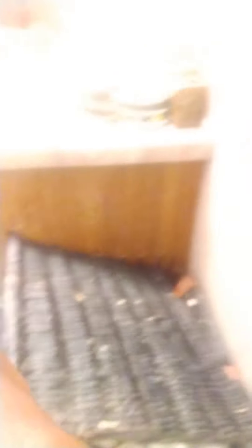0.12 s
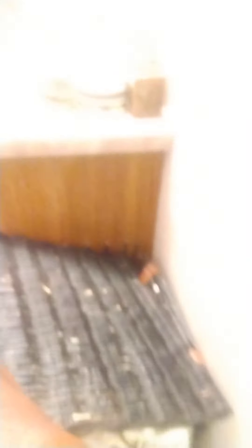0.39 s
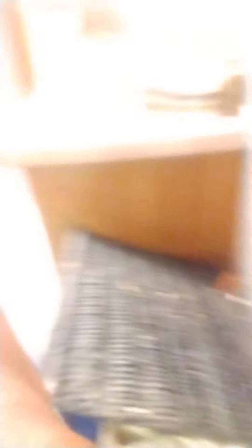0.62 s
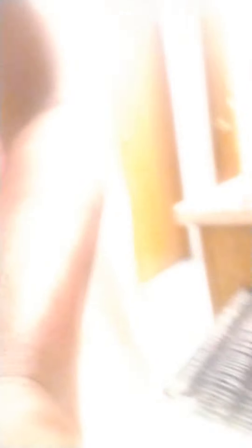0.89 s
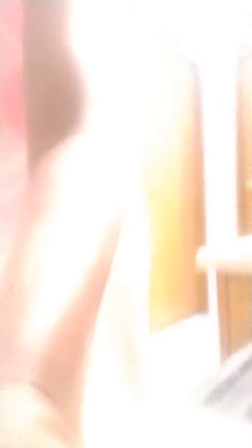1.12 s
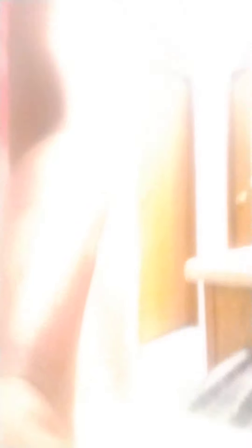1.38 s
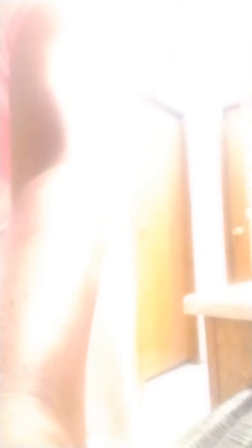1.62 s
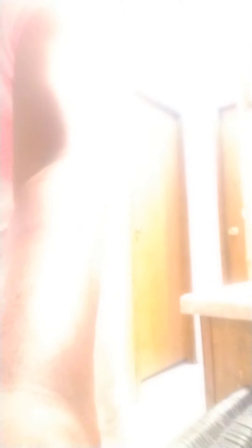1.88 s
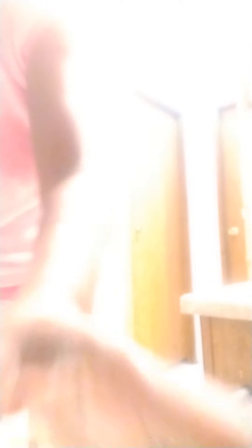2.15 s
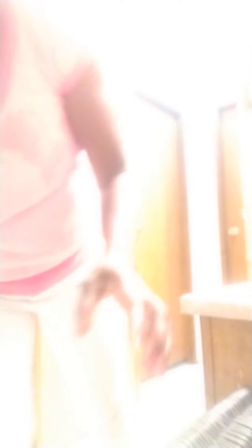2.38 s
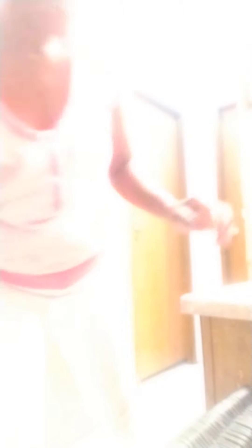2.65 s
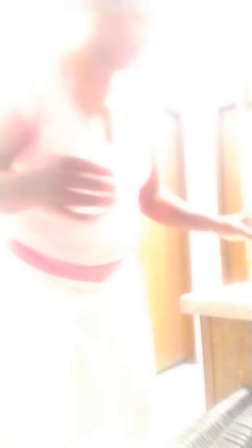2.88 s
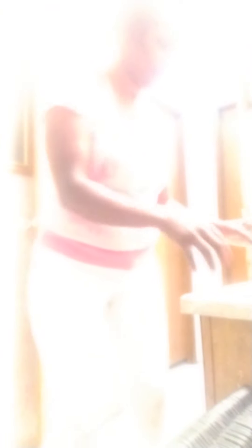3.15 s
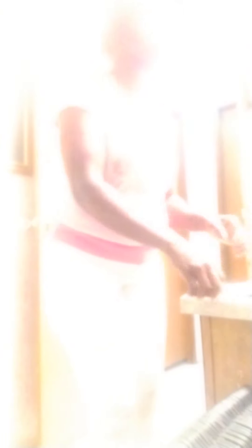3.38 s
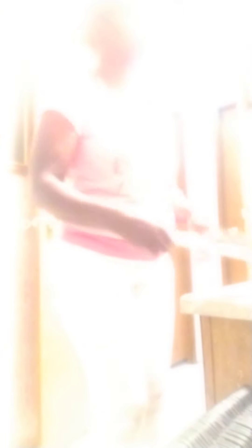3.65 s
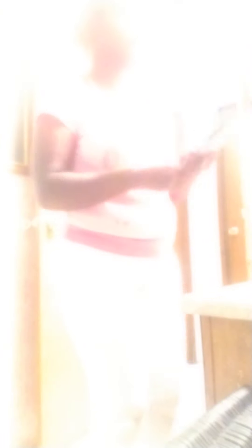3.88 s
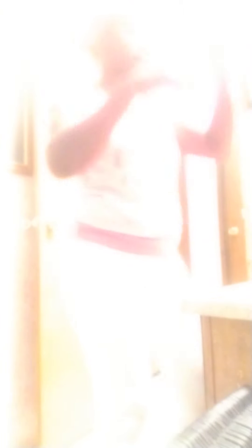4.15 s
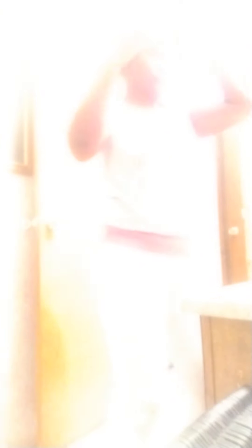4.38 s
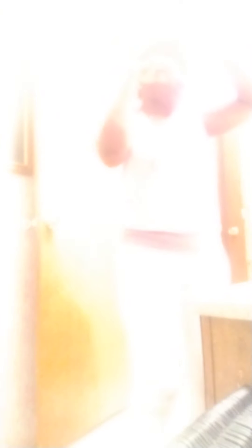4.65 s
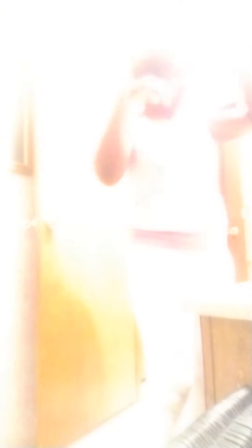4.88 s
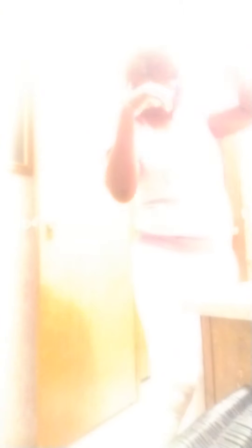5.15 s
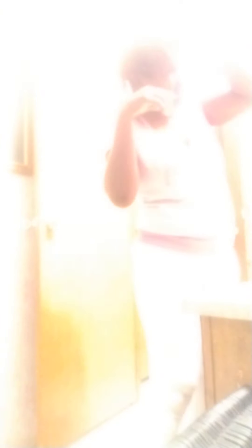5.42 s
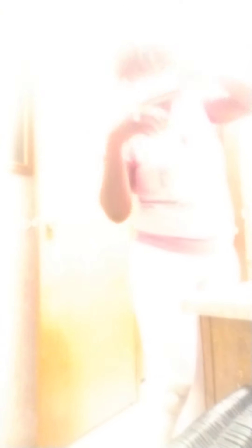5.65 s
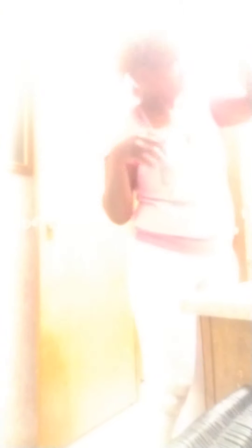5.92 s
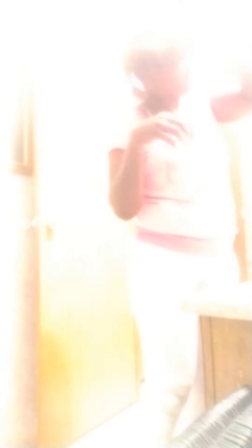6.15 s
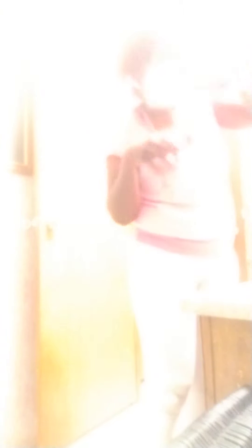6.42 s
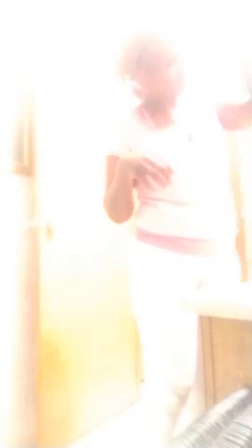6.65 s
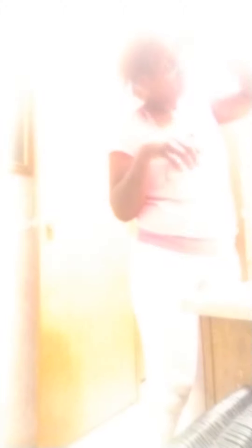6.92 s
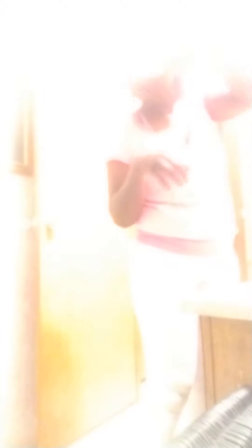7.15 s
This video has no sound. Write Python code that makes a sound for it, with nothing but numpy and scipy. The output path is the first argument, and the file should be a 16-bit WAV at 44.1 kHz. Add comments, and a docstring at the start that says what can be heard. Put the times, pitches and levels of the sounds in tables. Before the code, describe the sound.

A phone knocks and jolts hard onto a hollow bathroom fitting, slides into place, then small things tap on the counter amid soft cloth rustles.

```python
"""A hollow bathroom fitting rings dully as a phone propped on it knocks, jolts and slides into place;
each knock is a sum of decaying modes, and each slide is noise shaped by the same resonances.
Later, small things are moved and tapped on the counter, felt through the fitting, and cloth rustles:
taps excite the modes, hard edges give short noise cracks, friction gives swelling coloured noise.
A quiet room lies beneath, made of coloured noise and wavering hum lines; a thin hiss comes and goes."""
import sys
import numpy as np
from scipy import signal
from scipy.fft import rfft, irfft, next_fast_len
from scipy.io import wavfile
from scipy.ndimage import uniform_filter1d

SR = 44100
rng = np.random.default_rng(int(sys.argv[2]) if len(sys.argv) > 2 else 0)


def transcribe(u):
    """Save the signal u as a 16-bit wav file named by the first command-line argument.

    u: samples, shape (n,) or (channels, n), limited to [-1, 1]; the rate is SR.
    q: integer samples, one column per channel.
    """
    v = np.clip(np.atleast_2d(u).T, -1, 1)
    q = np.round(v * 32767).astype(np.int16)
    wavfile.write(sys.argv[1], SR, q)


def invert_db(x):
    """Field ratio 10**(x/20) for x, a level in decibels (scalar or array-like)."""
    u = np.asarray(x, float) / 20
    return 10 ** u


N = 321489
TIME = np.arange(N) / SR
FADE_DB = 20  # rise and fall times of a swell span this much

# Likeness of the left and right sound fields: frequency_hz, likeness (0 to 1)
LIKENESS = [(60, 0.4), (300, 1), (640, 0.37), (1300, 0), (16000, 0)]
# Spectrum of the still air and microphone hiss: frequency_hz, relative_density_db (per Hz)
ROOM_COLOUR = [(20, -47.5), (40, -22), (70, -12), (110, -9), (176, -10.5), (230, -11.5), (330, -13.5),
               (419, -33), (775, -24.5), (1300, -26.5), (1890, -30), (2240, -27), (3310, -35.5),
               (8000, -41), (11000, -41), (15800, -42.5)]
# Appliance hum lines: frequency_hz, level_db (rms, before lift and wavering), waver_db (signed)
HUM_LINES = [(56.8, -69, 0.15), (108.3, -74, 2.5), (178, -72.5, 1.5), (225, -79, 1), (2206, -92, 4.5),
             (2270, -90.5, -1.5)]
# The fitting passes on more hum than the hand did: time_s, lift_db
HUM_LIFT = [(0, -0.5), (1.2, 1), (1.4, 1.5), (7.29, 0)]
# Modes of the hollow fitting: frequency_hz, relative_level_db, t60_s (before contact changes it)
FITTING_MODES = [(105, -5, 0.09), (179.8, 1, 0.092), (255, -4.5, 0.16), (315, 0, 0.14), (377, -3, 0.2),
                 (456.4, -4.5, 0.14), (564.5, -7, 0.077), (648, -7, 0.13), (764, -14, 0.24),
                 (875, -13, 0.32), (956, -9, 0.11), (1038, -20, 0.093), (1113, -26.5, 0.38),
                 (1328, -19, 0.151), (1636, -16, 0.033), (1880, -22, 0.13), (2012, -21, 0.047),
                 (2380, -19, 0.0592), (2800, -29.5, 0.0735)]
# Humming of the fitting at rest, faint while the phone is still in the hand:
# time_s, low_modes_db, upper_modes_db
REST_LEVELS = [(0, -74, -79), (.5, -77, -92), (1.02, -71, -99), (1.45, -61, -76), (2.0, -62, -81),
               (2.8, -64, -94), (3.3, -60.5, -76), (4.5, -62.5, -80), (5.3, -61, -69), (6.0, -63.5, -75.5),
               (6.35, -60, -74.5), (6.75, -65, -81), (7.29, -57.5, -74.5)]
# Slides and shoves along the fitting: peak_s, rise_s, fall_s, low_modes_db, upper_modes_db
SHOVES = [(1.13, 0.033, 0.26, -48.5, -58.5), (1.205, 0.036, 0.1, -52, -55.5),
          (1.304, 0.036, 0.1, -45, -48.5), (1.37, 0.031, 0.12, -48.5, -60.5),
          (1.52, 0.041, 0.27, -51.5, -60), (1.6, 0.17, 0.13, -50.5, -54), (1.81, 0.047, 0.12, -51.5, -72),
          (1.869, .08, 0.1, -62.5, -70), (2.95, .06, 0.24, -74, -74), (3.525, 0.097, .22, -47.5, -59),
          (3.62, 0.053, 0.027, -70, -66), (4.27, .1, 0.11, -64.5, -66.5), (4.46, 0.027, 0.1, -52, -69.5),
          (4.67, 0.06, .3, -62, -61.5), (4.79, 0.14, 0.26, -47, -52.5), (4.87, 0.26, 0.092, -51, -61),
          (5.03, .04, .2, -78, -63.5), (5.466, 0.055, 0.08, -58.5, -60), (5.68, 0.57, 0.059, -61.5, -67),
          (6.245, 0.064, .3, -63, -68.5), (6.475, 0.054, 0.074, -56, -66.5), (6.98, 0.013, .15, -58, -68),
          (7.17, 0.41, 0.22, -65.5, -67.5)]
# Blows on the phone's case: start_s, level_db (nearer port), left_minus_right_db, swing_hz,
# cycles (decay scale), first_swing (-1 in, 1 out)
JOLTS = [(1.2876, -1, -17, 350, 1.25, -1), (1.2964, -10, -16, 650, 1.1, 1), (1.0846, -20, -8, 750, 1.2, 1)]
# Hard edges clicking: start_s, level_db (6 dB above onset rms), left_minus_right_db, centre_hz,
# decay_ms (to 1/e)
TICKS = [(1.085, -30, 12.5, 4080, 0.33), (1.204, -55, 27, 9100, 5.7), (1.288, -21.5, -13.5, 6200, 1.1),
         (1.2885, -19, -24, 1052, 2.4), (1.2899, -31.5, -15, 5540, 1.5), (1.2975, -20.5, 8.5, 8500, 0.72),
         (1.5212, -55, 20.5, 9600, 3.6), (1.716, -42.5, -11, 2460, 0.49), (1.7709, -57, -5, 6200, 3),
         (1.494, -56, 2, 1290, 1.7), (1.624, -44, -2, 1900, 2.2), (1.8786, -56, -8, 3160, 1.2),
         (2.9637, -62.5, 14, 10740, 21), (2.964, -64, 7, 5770, 73), (3.509, -49, 9, 2200, 3),
         (3.94, -67, 14.5, 11500, 28), (4.2248, -56, 9, 3600, 4.5), (4.263, -61, 8, 1970, 3.5),
         (4.5441, -55.5, 11.5, 11400, 30), (4.653, -46, 7.5, 4900, 24), (4.7256, -42, 12, 8600, 3),
         (4.8464, -48, 11, 8060, 3.3), (4.8594, -46, 13, 13000, 3), (4.9316, -51, 14, 10000, 2.2),
         (4.995, -56, 7, 1200, 2.2), (5.026, -51, 11, 3800, 1.4), (5.2794, -52.5, 9, 11400, 9),
         (5.447, -56, 6, 3180, 30), (6.238, -59, 7, 3150, 15), (6.4073, -59, 8.5, 11200, 2.7),
         (6.4657, -60, 12, 10200, 4.3), (6.977, -45.5, 12, 9200, 4)]
# Phone knocking on the fitting: start_s, peak_db (before high-pass), left_minus_right_db,
# favoured_mode_hz, brightness_db (per octave), ring_factor (on t60)
KNOCKS = [(1.0852, -24, 13.5, 306, 0.5, 0.37), (1.0937, -21.5, 10, 513, -1, 0.75),
          (1.096, -32.5, 1, 875, -4, 0.2), (1.122, -31, 12, 377, 0, 0.61),
          (1.125, -37, 6.5, 1328, -19, 1.5), (1.201, -37.5, 13, 105, -9, 0.59),
          (1.288, -12.5, -14.5, 174, -4, 0.18), (1.289, -17, 7, 315, -8, 0.7),
          (1.298, -32.5, 6, 1880, -2.5, 1.6), (1.2995, -25, 12, 340, 0.5, 0.75),
          (1.335, -32, 9, 315, -5, .48), (1.352, -38.5, 15, 875, -12, 0.73),
          (1.494, -31.5, 8, 338, -3.5, 0.48), (1.525, -38, 13, 255, 3, 0.29),
          (1.556, -35, 8, 354, -1.5, 0.51), (1.623, -25.5, 0, 238, -11, 0.29),
          (1.625, -32, 11.5, 990, -4, 0.67), (1.633, -31, 10, 431, -11, 0.3),
          (1.653, -32, 2, 435, -1, 0.43), (1.704, -44, 13, 269, -6, 0.36),
          (1.716, -39.5, -0.5, 105, 0, 0.18), (1.79, -34.5, 12, 315, -5, 0.23),
          (1.838, -38, 7.5, 262, -3.5, 0.48), (1.858, -37.5, 6, 379, -7, 0.66),
          (4.4548, -34.5, 9, 375, -21, 0.45)]
# Things tapped on the counter, felt through the fitting: start_s, peak_db (before high-pass),
# brightness_db (per octave), ring_factor (on t60)
TAPS = [(2.944, -58, -12, 0.54), (3.012, -47, -8, 0.55), (3.237, -49.5, -10.5, 0.95),
        (3.316, -51.5, -15, 2), (3.457, -48.5, -12, 2.5), (3.507, -34, -3.5, 0.72),
        (3.538, -37.5, -4, 0.78), (4.687, -44.5, -1.5, .84), (4.726, -36.5, -4, 1.1),
        (4.768, -40, -2, 0.71), (4.787, -37, 1, 0.45), (4.844, -29.5, 1, 0.92), (4.881, -40, -2, 1.1),
        (4.997, -45, 5.5, 0.21), (5.026, -46, 7, 0.34), (5.27, -47.5, -7, 1.1), (6.9744, -41, 3, 1.1)]
# Friction spectra, dull share, bright core and airy share: frequency_hz, relative_density_db (per Hz)
DULL_COLOUR = [(2000, -12), (2700, -3), (3200, -2.5), (4500, -6), (5800, -6), (7000, -21.5)]
BRIGHT_COLOUR = [(4500, -36.5), (5800, -10), (7300, -7.5), (9000, -7), (10000, -4.5), (11300, -3.5),
                 (12000, -9), (13000, -36.5)]
AIRY_COLOUR = [(11000, -37), (12200, -1), (14000, -4.5), (15800, -12)]
# Swishes of cloth and skin: peak_s, rise_s, fall_s, level_db (bright core), dull_share_db (relative)
SWISHES = [(1.09, 0.011, 0.036, -70, 9), (1.3, 0.011, 0.079, -68, 6.5), (1.15, .1, 0.35, -80, 3),
           (1.4, .3, 1.6, -80, 4), (1.77, 0.056, 0.49, -75, -6), (1.86, 0.12, 0.058, -76.5, -1),
           (2.97, 0.024, .12, -69, -5), (3.02, .06, 0.093, -72, -9.5), (3.17, 0.089, 1.1, -69, -11),
           (3.28, 0.17, 0.22, -75, 7), (3.42, 0.85, 0.32, -65, -5.5), (3.525, 0.13, 0.16, -59, -2),
           (3.6, .1, 0.055, -74, -1), (3.78, 0.28, 0.44, -76.5, 3.5), (3.95, 0.044, 0.49, -73.5, -2),
           (4.22, 0.48, 0.17, -77, -1), (4.4, 1.1, 1.5, -79.5, 1.5), (4.555, 0.027, .15, -75.5, -7),
           (4.62, .06, 0.08, -68, -13), (4.664, 0.022, 0.085, -44.5, -8.5), (4.78, 0.19, .3, -62.5, -1.5),
           (4.86, 0.24, 0.086, -62.5, -2), (4.93, .08, 0.93, -72.5, 1), (5.29, 0.031, 0.064, -68.5, 1),
           (5.36, 0.14, 0.45, -73, -5), (5.465, 0.068, 0.15, -63.5, -3.5), (5.6, 0.32, 0.58, -69.5, -3.5),
           (5.8, .2, 0.29, -70.5, -4.5), (6.12, 0.095, 0.39, -73, -9), (6.25, 0.12, 0.2, -64, -8.5),
           (6.47, 0.15, 0.14, -74, -3.5), (6.57, .1, 0.32, -78, -7.5), (6.8, 2.6, 1.2, -85, -1),
           (6.985, 0.026, 0.11, -66.5, -4), (7.15, .3, 0.82, -71.5, -7.5)]
# Case scraping close to the left port: start_s, length_s, end_level_db (bright core),
# swell_db (end minus start), dull_share_db (relative)
SCRAPES = [(1.198, 0.076, -76, -5, -4.5), (1.52, 0.13, -59, 4, -10), (1.708, 0.037, -73.5, 1, -7.5)]
# Modes of a small glazed piece: frequency_hz, initial_level_db (rms), t60_s
CLINK_MODES = [(2853, -68, .15), (3005, -54, .14), (3130, -60, .12), (3176, -52, .22), (3332, -64, .12),
               (3914, -62, .14), (4790, -70, .14)]
# Spectrum of the thin hiss: frequency_hz, relative_density_db (per Hz)
THIN_HISS_COLOUR = [(9000, -30), (9700, -1.5), (11400, 0.5), (12000, -29)]
# Span of the thin hiss: start_s, end_s
THIN_HISS_SPAN = (1.7, 3.05)


def curve(rows):
    """Linear interpolation: the columns of a time table, one value per sample."""
    s, *columns = np.transpose(rows)
    return [np.interp(TIME, s, c) for c in columns]


def over_hz(rows, hz):
    """Logarithmic frequency axis: a spectrum table read at the given frequencies."""
    f, v = np.transpose(rows)
    return np.interp(np.log(hz + 1), np.log(f), v)


def sides(pan_db):
    """Interaural level difference: left and right gains, half the difference each way."""
    return invert_db(np.array([pan_db, -pan_db]) / 2)


def unit(x):
    """Normalisation to an rms of 1."""
    return x / np.sqrt(np.mean(x ** 2))


def walk(rate):
    """Low-passed random steps: a smooth wander of rms 1, with rate steps a second."""
    k = int(SR / rate)
    steps = np.repeat(rng.standard_normal(N // k + 1), k)
    return unit(uniform_filter1d(uniform_filter1d(steps, k), k)[:N])


def pair(gain_of_hz):
    """Partial coherence: coloured stereo noise, most alike near 300 Hz and unrelated in the treble."""
    size = next_fast_len(N)
    hz = np.arange(size // 2 + 1) * SR / size
    like = np.clip(over_hz(LIKENESS, hz), 0, 1)
    mid, side = rfft(rng.standard_normal((2, size))) * gain_of_hz(hz)
    mid = mid * np.sqrt(1 + like)
    side = side * np.sqrt(1 - like)
    return unit(irfft([mid + side, mid - side], size)[:, :N])


def add(out, s, sound):
    """Superposition: mixes a short sound in at time s."""
    i = int(s * SR)
    out[:, i:i + sound.shape[1]] += sound[:, :N - i]


def swell(s, rise_s, fall_s):
    """Exponential growth and decay: gain climbs to 1 at time s and falls, both evenly in dB."""
    coarse = TIME[::16]  # every 16th sample is fine enough
    distance = np.maximum((s - coarse) / rise_s, (coarse - s) / fall_s)
    return np.repeat(invert_db(-FADE_DB * distance), 16)[:N]


def blend(gains):
    """Incoherent summation: unrelated noises add in power."""
    return np.sqrt(sum(g ** 2 for g in gains))


def room():
    """Stationary background: coloured noise plus sinusoids whose level and phase wander."""
    air = invert_db(-68.5) * pair(lambda hz: invert_db(over_hz(ROOM_COLOUR, hz)))
    hum = 0
    for hz, db, waver_db in HUM_LINES:
        level = np.sqrt(2) * invert_db(db + waver_db * walk(8.7))
        phase = 0.42 * waver_db * walk(33)  # radians
        hum = hum + level * np.sin(2 * np.pi * hz * TIME + phase)
    return (air + hum * invert_db(curve(HUM_LIFT)[0])) * sides(1.2)[:, None]


def slide():
    """Frictional excitation: rubbing noise feeds resonances damped by contact; low and upper rise apart."""
    shapes = [swell(s, rise, fall) for s, rise, fall, *_ in SHOVES]
    gains = []
    for rest_db, shove_db in zip(curve(REST_LEVELS), np.transpose(SHOVES)[3:]):
        gains.append(blend([invert_db(rest_db)] + [invert_db(db) * g for db, g in zip(shove_db, shapes)]))
    low_gain, upper_gain = gains

    def modes(group, bright_db, damping):
        """Resonance curve: powers of the modes add, each the wider the greater its damping."""
        def gain(hz):
            power = 0
            for f, db, t60 in group:
                level = invert_db(db + bright_db * np.log2(f / 300))
                power = power + level ** 2 / (1 + ((hz - f) * t60 / damping) ** 2) ** 2
            return np.sqrt(power)
        return gain

    low = pair(modes(FITTING_MODES[2:10], bright_db=0.5, damping=8.6))
    upper = pair(modes(FITTING_MODES[9:], bright_db=0.0, damping=18.3))
    low = low * low_gain * invert_db(1.5 * walk(25))
    upper = upper * upper_gain * invert_db(2.04 * walk(40))
    return (low + upper) * sides(2)[:, None]


def jolts():
    """Impulsive pressure: a blow throws the nearer port in pointed swings that die within two cycles."""
    out, t = np.zeros((2, N)), np.arange(int(SR / 20)) / SR
    for s, db, pan_db, hz, cycles, way in JOLTS:
        swing = way * np.sin(2 * np.pi * hz * t)
        pointed = .25 * swing + .75 * swing ** 7
        pulse = pointed * np.exp(-(t * hz / cycles) ** 4)
        far_cut = invert_db(np.minimum([pan_db, -pan_db], 0))[:, None]  # only the farther port is weakened
        add(out, s, invert_db(db) * far_cut * pulse)
    # the port's vent lets slow pressure out
    return signal.sosfilt(signal.butter(1, 60, "high", fs=SR, output="sos"), out)


def ticks():
    """Broadband transients: noise cracks around a centre pitch, with a faint tail from the near walls."""
    out, t = np.zeros((2, N)), np.arange(4096) / SR
    hz = np.arange(2049) * SR / 4096
    noises = rng.standard_normal((len(TICKS), 2, 4096))
    for (s, db, pan_db, centre_hz, ms), noise in zip(TICKS, noises):
        octaves = np.log2((hz + 1) / centre_hz)
        slope_db = np.where(octaves > 0, -13., 8.) * (0.66 + ms / 8)  # longer scuffs are narrower in pitch
        colour = invert_db(slope_db * octaves)
        shape = np.exp(-t * 1000 / ms) + invert_db(-38) * np.exp(-t / 0.004)
        sound = irfft(rfft(noise) * colour) * shape
        onset_rms = np.sqrt(np.mean(sound[:, :32] ** 2))
        add(out, s, invert_db(db) * sides(pan_db)[:, None] * sound / onset_rms / 2)
    return out


def knocks():
    """Modal excitation: a knock or tap rings the modes, most of all near the one its spot favours."""
    out, t = np.zeros((2, N)), np.arange(int(SR / 2)) / SR
    hz, mode_db, t60 = (c[:, None] for c in np.transpose(FITTING_MODES))
    # the counter always favours the same 320 Hz, almost from the middle
    taps = [(s, db, -1, 320, bright_db, ring) for s, db, bright_db, ring in TAPS]
    blows = KNOCKS + taps
    chance = rng.standard_normal((len(blows), 3, len(FITTING_MODES), 1))
    apart = np.arccos(np.clip(over_hz(LIKENESS, hz), 0, 1))  # the ports hear high modes out of step
    for (s, db, pan_db, spot_hz, bright_db, ring), (size, turn, step) in zip(blows, chance):
        octaves = np.log2(hz / spot_hz)
        # modes under the favoured one are stirred somewhat less, the lower the weaker
        slope_db = np.where(octaves > 0, bright_db, 4.5) * octaves
        favour_db = 8.7 * np.exp(-(octaves / 0.081) ** 2)
        gain = invert_db(mode_db + slope_db + favour_db) * invert_db(1.5 * size)
        decay = np.exp(-np.log(1000) * t / (t60 * max(ring, .05)))
        # dull blows press longer
        rise_rate = np.minimum(hz, spot_hz * 0.84) * 8.4 * invert_db(.7 * min(bright_db, 0))
        envelope = gain * decay * (1 - np.exp(-t * rise_rate)) ** 2
        phase = 2 * np.pi * hz * t + np.pi + 0.78 * turn
        offset = apart * step / 2
        sound = np.array([(envelope * np.sin(phase + side * offset)).sum(0) for side in (1, -1)])
        add(out, s, invert_db(db) * sides(pan_db)[:, None] * sound / np.abs(sound).max())
    # the microphone hears little below 80 Hz
    return signal.sosfilt(signal.butter(2, 80, "high", fs=SR, output="sos"), out)


def rustle():
    """Friction noise: grainy strokes, each with dull and airy shares beside its bright core."""
    # each stroke: gain, dull share dB, airy share dB, left minus right dB
    strokes = []
    for s, rise, fall, db, dull_db in SWISHES:
        strokes.append((invert_db(db) * swell(s, rise, fall), dull_db, -5, 8.5))
    edge_s = .025
    for s, length, db, swell_db, dull_db in SCRAPES:
        corners_s = [s - edge_s / 4, s, s + length, s + length + edge_s]
        corners_db = [-120, db - swell_db, db, db - 2 * FADE_DB]
        db_now = np.interp(TIME, corners_s, corners_db, right=-120)
        strokes.append((invert_db(db_now), dull_db, -14, 23))
    stir = invert_db(-85 + 1.5 * walk(7.8)) * (TIME > 1.2)  # faint stirring between the swishes
    strokes.append((stir, -1, -10, 3.5))

    power = np.array([g ** 2 for g, *_ in strokes])
    dull_db, airy_db, pan_db = (np.array(c) for c in list(zip(*strokes))[1:])
    sound = 0
    for colour, share_db in ((DULL_COLOUR, dull_db), (BRIGHT_COLOUR, 0), (AIRY_COLOUR, airy_db)):
        gain = np.sqrt((sides(pan_db) * invert_db(share_db)) ** 2 @ power)
        sound = sound + pair(lambda hz: invert_db(over_hz(colour, hz))) * gain
    return sound * invert_db(1.2 * walk(60))


def clink():
    """Free vibration: a few thin high modes of a small glazed piece, struck once."""
    out, t = np.zeros((2, N)), np.arange(int(SR / 2)) / SR
    ring = 0
    for hz, db, t60 in CLINK_MODES:
        decay = np.exp(-np.log(1000) * t / t60)
        ring = ring + invert_db(db) * decay * np.sin(2 * np.pi * hz * t)
    add(out, 1.0925, np.sqrt(2) * ring * sides(3.2)[:, None])
    return out


def thin_hiss():
    """Band-limited noise: a faint hiss high in the treble for a while after the phone is set down."""
    start, end = THIN_HISS_SPAN
    hiss = invert_db(-87.5) * pair(lambda hz: invert_db(over_hz(THIN_HISS_COLOUR, hz)))
    return hiss * ((TIME > start) & (TIME < end)) * sides(5.)[:, None]


def scene():
    """Superposition: the sum of all sources as the two ports hear them."""
    return room() + slide() + jolts() + ticks() + knocks() + rustle() + clink() + thin_hiss()


def roll_off(x):
    """The treble ends steeply here."""
    return signal.sosfilt(signal.butter(12, 16530, fs=SR, output="sos"), x)


def record(dry):
    """Low-pass filtering: the phone cuts the treble steeply above 15.8 kHz."""
    low_pass = signal.ellip(8, .2, 70, 15800, fs=SR, output="sos")
    mix = signal.sosfilt(low_pass, dry)
    return roll_off(mix)


dry = scene()
out = record(dry)
transcribe(out)
```